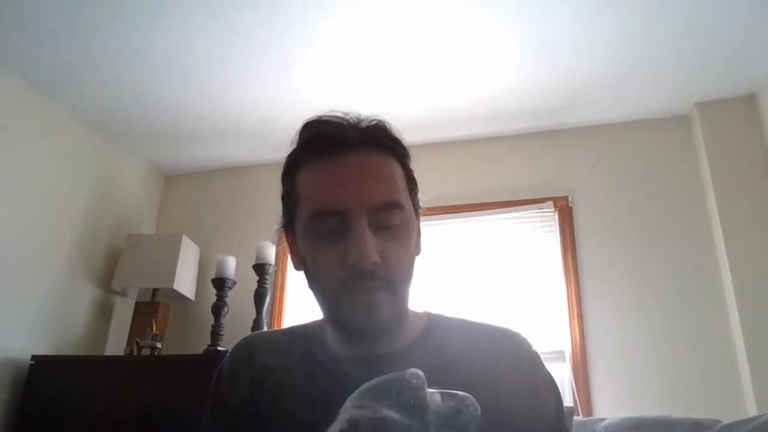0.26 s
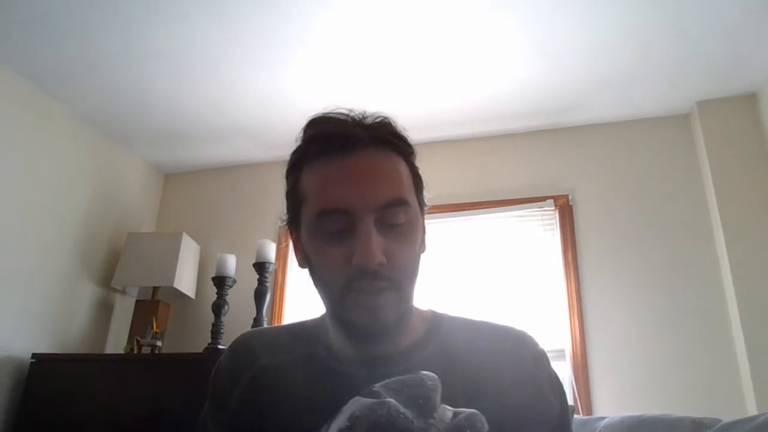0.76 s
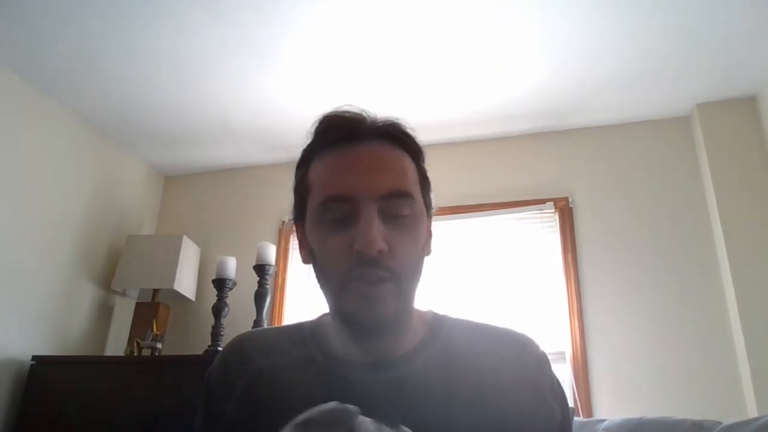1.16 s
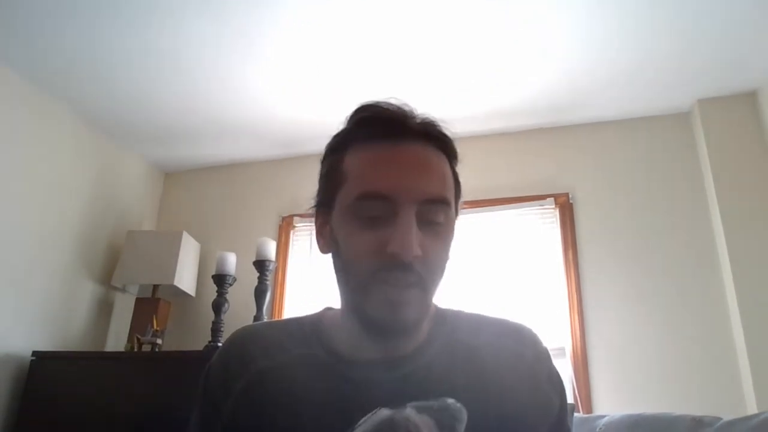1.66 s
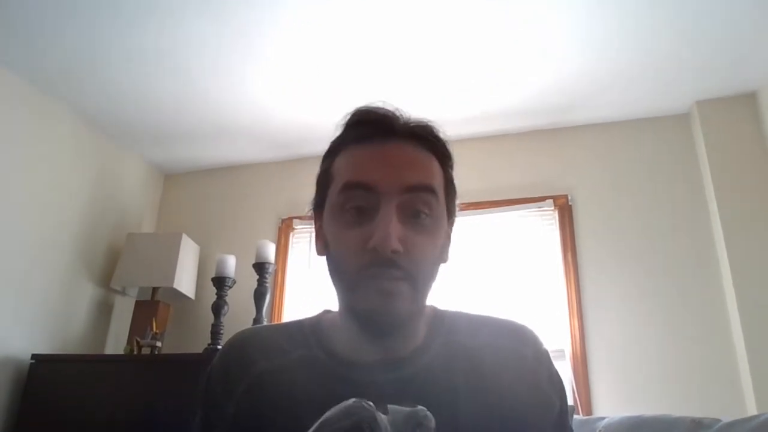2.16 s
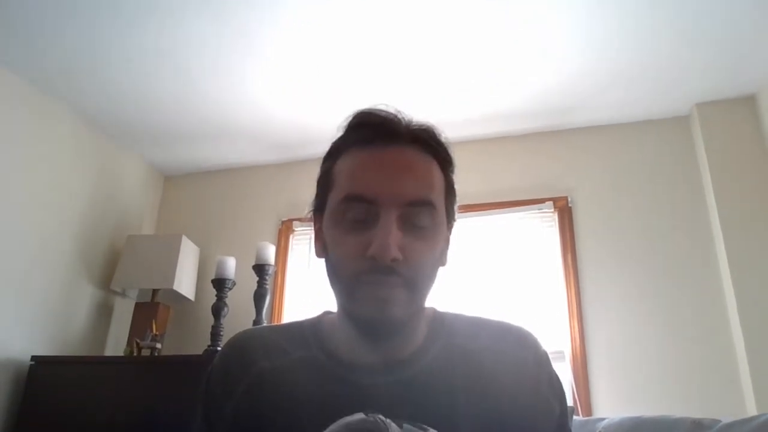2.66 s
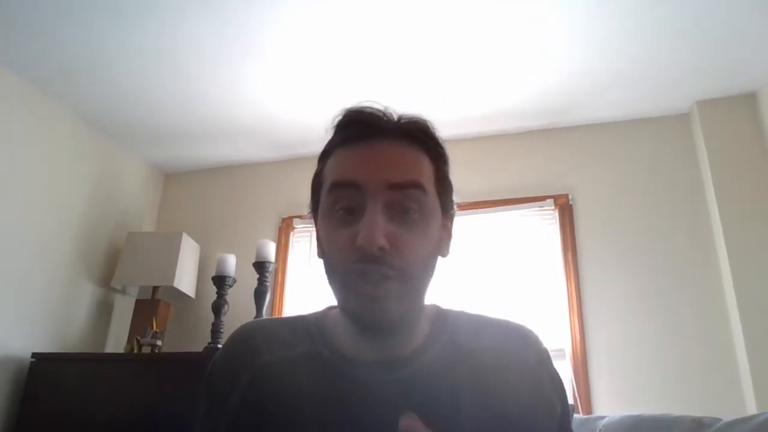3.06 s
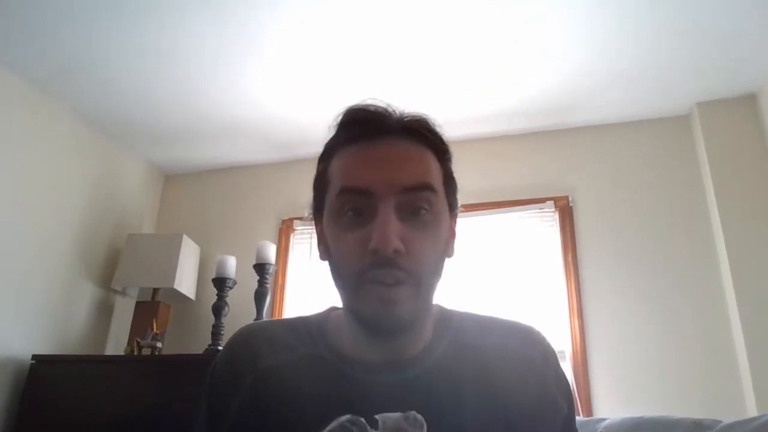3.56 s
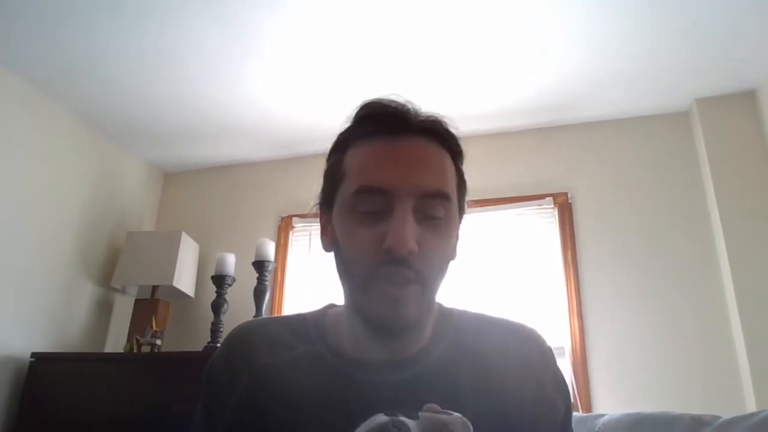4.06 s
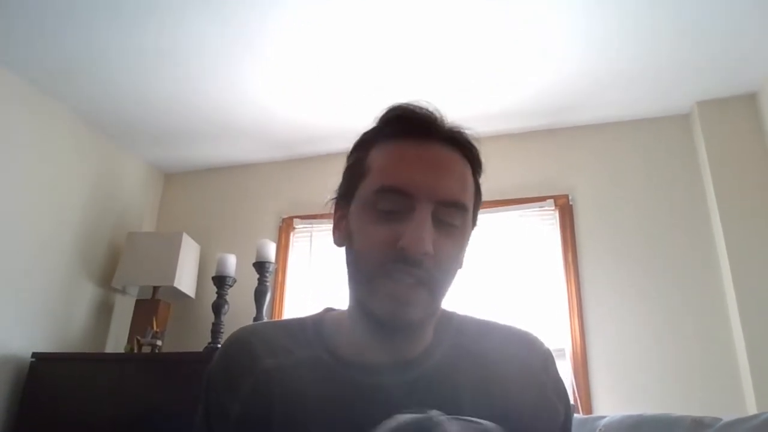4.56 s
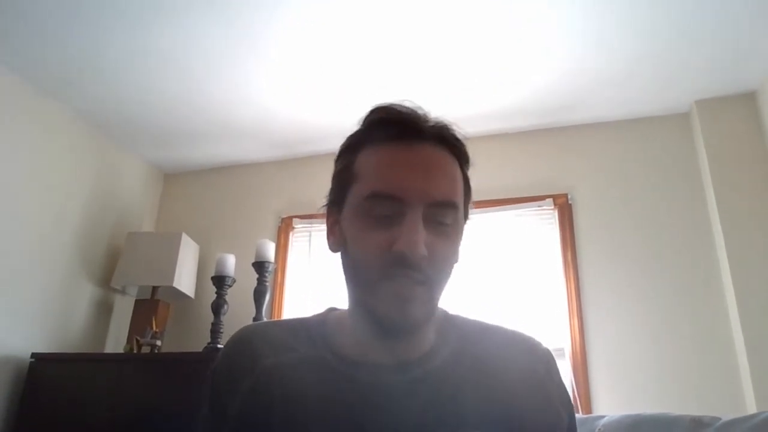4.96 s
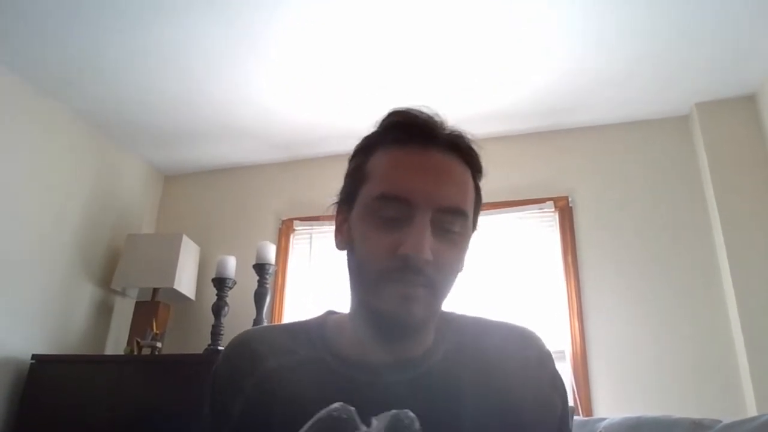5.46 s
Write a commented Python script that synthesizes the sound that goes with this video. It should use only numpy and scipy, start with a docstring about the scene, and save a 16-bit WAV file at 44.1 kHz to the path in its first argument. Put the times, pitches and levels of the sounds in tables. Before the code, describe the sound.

Cloth rubs dryly over a hollow plastic bottle, indoors and close up. The wall creases in sharp little clicks while soft pushes make dull, low, quickly damped knocks. The biggest pop comes early, another cluster of thumps follows, crackling thickens after three seconds, thins out, then ends with strong clustered knocks and snaps. The room answers briefly; the slightly thin microphone adds quiet hiss.

```python
"""A low rumble sinks under the first soft wipes of cloth on an empty plastic bottle turned in the hands.
Cloth scrapes the wall in grains, which are noise shaped by wall and cavity resonances; creases snap as short
noise bursts, and soft knocks ring the hollow body as sums of damped sines.
A furnished room answers briefly with a decaying diffuse tail, over quiet room tone and hiss."""
import sys
import numpy as np
from scipy import signal
from scipy.fft import rfft, irfft, next_fast_len
from scipy.io import wavfile
from scipy.ndimage import uniform_filter1d, map_coordinates

SR = 44100
rng = np.random.default_rng(int(sys.argv[2]) if len(sys.argv) > 2 else 0)


def generate_wav(signal):
    """Clip the signal to [-1, 1] and save it as 16-bit WAV at the path in sys.argv[1]."""
    frames = np.transpose(np.atleast_2d(signal))
    scaled = np.clip(frames, -1, 1) * 32767
    pcm = np.round(scaled).astype(np.int16)
    wavfile.write(sys.argv[1], SR, pcm)


def makeup_ratio(level_db):
    """Linear amplitude ratio for a level in decibels (20 dB per factor of ten)."""
    decades = np.asarray(level_db, float) / 20
    return 10 ** decades


N = 251811  # length in samples


def unit(x):
    """Normalisation of signal power: scaled to rms 1."""
    return x / np.sqrt(np.mean(x ** 2) + 1e-20)


def along(points, hz):
    """Interpolation of (Hz, value) points on a logarithmic frequency axis."""
    point_hz, values = np.transpose(points)
    return np.interp(np.log(hz + 1), np.log(point_hz + 1), values)


def filtered(x, response):
    """Linear filtering: the spectrum of x times a complex response of frequency."""
    size = next_fast_len(len(x) + 8192)
    return irfft(rfft(x, size) * response(np.fft.rfftfreq(size, 1 / SR)), size)[:len(x)]


def resonances(table):
    """Modal superposition: causal second-order resonances (Hz, width Hz, dB), alternating in sign."""
    def response(f):
        total = 0
        for k, (centre, width, db) in enumerate(table):
            damping = 1j * f * width
            total = total + (-1) ** k * makeup_ratio(db) * damping / (centre * centre - f * f + damping)
        return total
    return response


def wobble(rate):
    """Slow random modulation: a smooth curve through random knots, rate knots a second."""
    knots = rng.standard_normal(int(N * rate / SR) + 4)
    return map_coordinates(knots, [np.arange(N) * rate / SR])


def grit(rate, spread_db, life, smooth):
    """Granular friction: noise whose size jumps, rate times a second, in decaying grains of bounded strength.

    life is the decay time constant in seconds; smooth is the share of steady noise."""
    strength = makeup_ratio(spread_db * np.minimum(rng.exponential(size=N), 3))
    starts = (rng.random(N) < rate / SR) * strength
    grains = signal.lfilter([1], [1, -np.exp(-1 / (life * SR))], starts)
    return unit((unit(grains) + smooth) * rng.standard_normal(N))


def patchy(x, depth_db):
    """Time-frequency modulation: random gain patches, depth_db rms."""
    z = signal.stft(x, nperseg=256)[2]
    field = uniform_filter1d(rng.standard_normal(z.shape), size=4, axis=0)
    field = uniform_filter1d(field, size=6, axis=1)
    return unit(signal.istft(z * makeup_ratio(depth_db * unit(field)), nperseg=256)[1][:N])


def passes():
    """Energy addition: every pass of the cloth swells, holds and fades; gives scrape and murmur levels in dB."""
    # Passes of the cloth. Each row: peak time in seconds, rise in seconds, fall in seconds,
    # scrape level in dB, body murmur level in dB; rise and fall each span 20 dB.
    strokes = [(0.04, 0.16, 0.33, -56, -43), (0.17, 0.02, 0.04, -57, -48), (0.34, 0.045, 0.05, -24, -33),
               (0.533, 0.13, 0.18, -35, -43.5), (0.668, 0.014, 0.013, -32.5, -38.5),
               (0.74, 0.24, 0.13, -42.5, -42.5), (0.99, 0.14, 0.26, -51, -49),
               (1.2, 0.11, 0.23, -48.5, -41), (1.392, 0.1, 0.063, -45, -46),
               (1.51, 0.18, 0.069, -51.5, -48), (1.598, 0.079, 0.11, -44, -42.5),
               (1.73, 0.088, 0.051, -48.5, -30), (1.809, 0.055, 0.11, -48.5, -39.5),
               (1.94, 0.078, .07, -44, -54), (2.03, 0.071, 0.037, -54, -45),
               (2.131, 0.074, 0.19, -47, -35.5), (2.402, 0.11, 0.079, -44, -43),
               (2.54, 0.14, 0.29, -54.5, -50), (2.69, 0.068, 0.17, -46, -46),
               (2.855, .075, 0.092, -40, -46), (2.949, 0.018, 0.25, -54.5, -57.5),
               (3.192, 0.19, 0.098, -44.5, -52.5), (3.299, 0.12, 0.11, -42.5, -39.5),
               (3.521, 0.032, 0.079, -40, -39.5), (3.64, 0.16, 0.21, -44, -32.5),
               (3.748, 0.05, 0.11, -40, -34.5), (3.982, 0.082, 0.12, -44.5, -39),
               (4.1, 0.069, 0.71, -57.5, -55), (4.249, 0.053, 0.051, -56.5, -47.5),
               (4.424, 0.018, 0.013, -50, -70.5), (4.64, 0.43, 0.34, -56.5, -58),
               (4.768, 0.08, 0.22, -49, -45.5), (4.961, 0.041, 0.097, -41.5, -36.5),
               (5.08, 0.16, 0.29, -49.5, -39.5), (5.18, 0.069, 0.22, -46, -36),
               (5.321, 0.057, 0.11, -38, -35.5), (5.439, 0.03, .1, -43.5, -38.5),
               (5.682, 0.11, 0.036, -34.5, -29.5)]
    hold = 0.13  # share of the rise and of the fall spent at full pressure
    roundness = 1.05  # 1 = pointed pass, 2 = bell
    t = np.arange(N) / SR
    power = np.full((2, N), 1e-10)
    for s, rise, fall, scrape_db, body_db in strokes:
        away = np.where(t < s, (s - t) / rise, (t - s) / fall)
        away = np.maximum(away - hold, 0) / (1 - hold)
        peak_power = makeup_ratio([[2 * scrape_db], [2 * body_db]])
        power = power + peak_power * makeup_ratio(-2 * 20 * away ** roundness)
    return 10 * np.log10(power)


def wiping():
    """Friction excitation: cloth catches on the wall in grains; the grip sets wall and hollow body murmuring."""
    # Spectrum of the cloth on the wall. Each row: frequency in Hz, gain in dB.
    scrape_curve = [(700, -26), (1400, 0.5), (2000, -1.5), (4000, 4.5), (5500, -0.5), (7000, -3),
                    (8200, -19), (11000, -31)]
    # Spectrum of the finer, brighter fibre noise. Each row: frequency in Hz, gain in dB.
    fibre_curve = [(6000, -33), (7800, 0.5), (9000, 2), (11200, -1), (14000, 3.5), (15800, 2.5)]
    # Resonances colouring the scrape. Each row: frequency in Hz, width in Hz, gain in dB before mixing.
    shell = [(1840, 90, 8.4), (2150, 47, 1), (3200, 170, 0.83), (3786, 33, 4.25), (5220, 1600, 0.55)]
    # Resonances of the hollow body. Each row: frequency in Hz, width in Hz, relative level in dB.
    hollow = [(205, 38, 0.5), (308, 28.5, 6), (420.7, 12, -2.5), (481, 48, -10), (657, 110, -12)]
    # Wall resonances under rubbing. Each row: frequency in Hz, width in Hz, relative level in dB.
    panel = [(934, 44, 3.5), (1050, 17.3, 8.5), (1132, 98, -0.5), (1363, 97, -2), (2050, 145, -7)]
    scrape_db, body_db = passes()
    # the wall, over the body murmur, follows about half of the scrape's lead
    panel_db = -6 + 0.48 * (scrape_db - body_db) + 3.44 * wobble(25)
    catches = grit(rate=400, spread_db=4, life=0.0015, smooth=1.3)
    scrape = filtered(catches, lambda f: makeup_ratio(along(scrape_curve, f)) * (1 + 0.38 * abs(resonances(shell)(f))))
    fibre = filtered(catches, lambda f: makeup_ratio(along(fibre_curve, f)))
    fibre_gain = makeup_ratio(-13 + 3.1 * wobble(30))  # over the scrape
    bright = patchy(scrape, depth_db=2.4) + fibre_gain * patchy(fibre, depth_db=2.4)
    bumps = grit(rate=80, spread_db=-2.5, life=0.0083, smooth=0.74)
    cavity = unit(filtered(bumps, resonances(hollow)))
    wall = unit(filtered(catches, resonances(panel)))
    murmur = cavity + makeup_ratio(panel_db) * wall
    return makeup_ratio(scrape_db + 0.42 * wobble(35)) * bright + makeup_ratio(body_db) * murmur


def rumble():
    """Resonant low-frequency noise: the dull rumble of the arms and seat moving."""
    # Slow course of the rumble. Each row: time in seconds, level in dB before a small random wobble.
    course = [(0.0, -33), (0.13, -45), (0.38, -55), (1.0, -57), (2.3, -51.5), (2.45, -60.5), (3.18, -58.5),
              (3.36, -49.5), (3.5, -52), (4.2, -57), (4.68, -59.5), (5.2, -51), (5.71, -65)]
    low = filtered(rng.standard_normal(N), lambda f: resonances([(110, 90, 0)])(f) ** 2)
    times, levels = np.transpose(course)
    level_db = np.interp(np.arange(N) / SR, times, levels)
    return makeup_ratio(level_db + 1.5 * wobble(4)) * unit(low)


def hush():
    """Stationary background noise: quiet room tone and microphone hiss with a fixed spectrum."""
    # Spectrum of the background. Each row: frequency in Hz, relative level in dB.
    spectrum = [(18, -52), (30, -125), (145, 7), (294, -8), (775, -15), (1060, -30), (1450, -30),
                (2040, -36), (2660, -34), (5120, -70.5), (8200, -47), (14200, -24), (15800, -47)]
    noise = filtered(rng.standard_normal(N), lambda f: makeup_ratio(along(spectrum, f)))
    return makeup_ratio(-60.5) * unit(noise)


def ticks():
    """Random buckling: randomly timed creases give way under the cloth, louder in stronger passes."""
    per_s, top_db = 70, -30  # mean rate; none of these creases is louder than top_db
    over_scrape_db, spread_db = -0.5, 5
    centre_hz, span_octaves, air_db = 3100, 1.6, -9.5
    when, size, pitch = rng.random((int(per_s * N / SR), 3)).T
    db = passes()[0][(when * N).astype(int)] + over_scrape_db
    db = np.minimum(db - spread_db * np.log(1 - 0.9 * size), top_db)
    hz = centre_hz * 2 ** (span_octaves * (pitch - 0.5))
    return [(s, level, f, air_db) for s, level, f in zip(when * N / SR, db, hz)]


def snaps():
    """Snap-through buckling: a crease flips in a sharp click and a short pitched burst with a breath of treble."""
    # Creases snapping at set times. Each row: start in seconds, peak level of the crack in dB, pitch in Hz,
    # peak level of the airy treble over the crack in dB.
    timed_creases = [(0.2942, -29, 4150, -24), (0.3186, -16, 4460, -33), (0.5114, -19.5, 3700, -33),
                     (0.5467, -40, 2540, -25), (0.5734, -22, 4870, -21), (0.6106, -22.5, 2150, -8),
                     (0.6644, -17, 2670, -15.5), (0.7217, -25.5, 1930, -25), (0.7587, -33, 2180, -14),
                     (0.816, -29.5, 3830, -16), (0.8566, -17.5, 3330, -35), (0.989, -2, 1960, -60),
                     (0.992, -33, 3100, -50), (1.1845, -32.5, 4830, -1), (1.2173, -24, 3350, -5),
                     (1.3546, -28, 3900, -21), (1.3906, -25, 2050, -13), (1.5913, -50, 4940, -10),
                     (1.6786, -22.5, 3600, -33), (1.717, -19.5, 2660, -38), (1.7703, -32.5, 2130, -29),
                     (1.92, -29, 4140, -3), (2.0787, -38.5, 2500, 0), (2.1053, -17, 3120, -13),
                     (2.1336, -18, 3760, -10), (2.3977, -34, 3870, -21), (2.53, -27.5, 3400, -37),
                     (2.594, -37.5, 1800, -32), (2.665, -27, 2370, -5), (2.718, -34, 2100, -7),
                     (3.276, -25, 5570, -24), (3.2979, -28, 1820, -11), (3.4824, -22.5, 4700, -15),
                     (3.4962, -34, 3870, 3), (3.52, -20, 1660, -8), (3.5403, -34, 1610, -10),
                     (3.559, -30, 3840, -24), (3.6128, -27.5, 3700, -15), (3.6326, -18, 3230, -19),
                     (3.653, -12, 3900, -35), (3.6608, -17, 1900, -29), (3.677, -37.5, 4700, 11),
                     (3.709, -24, 3750, -24), (3.7436, -21.5, 1700, -9), (3.8078, -30.5, 6240, -17),
                     (3.9839, -18, 3900, -21), (3.9996, -26, 4270, -23), (4.4166, -35, 2500, -5),
                     (4.6171, -44, 3470, -12), (4.653, -36.5, 2580, -14), (4.761, -18, 2440, -4),
                     (4.814, -38, 5100, -6), (4.898, -34, 4230, -39), (4.9551, -20, 1830, -16),
                     (5.037, -30, 2010, -11), (5.101, -25.5, 2050, -10), (5.2057, -39, 2090, 6),
                     (5.2487, -26, 2150, -7.5), (5.3117, -21, 1920, -14), (5.3353, -23, 3680, -27),
                     (5.6445, -14.5, 3470, -27), (5.6775, -18.5, 1660, -26), (5.683, -12, 2480, -15)]
    creases = timed_creases + ticks()
    out = np.zeros(N + SR)
    t = np.arange(SR // 20) / SR
    noises = rng.standard_normal((len(creases), len(t)))
    for (s, db, hz, air_db), noise in zip(creases, noises):
        # higher creases die sooner, stronger ones later
        t60 = 0.011 * (2870 / hz) ** 0.15 * 2 ** ((db + 22) / 35)
        burst = noise * makeup_ratio(-60 * t / t60) * (1 - np.exp(-t / 0.00021))
        burst[round(0.0004 * SR)] += 3.2  # the flip itself
        colour = resonances([(hz, 0.6 * hz, 0), (1.56 * hz, 1.72 * hz, -4), (0.36 * hz, 0.56 * hz, -9)])
        # steep fall above the pitch
        crack = filtered(burst, lambda f: colour(f) / (1 + 1j * f / (2.7 * hz)) ** 2)
        softened = burst * (1 - np.exp(-t / 0.00033))
        air = filtered(softened, lambda f: resonances([(13500, 7000, 0)])(f) ** 2)
        snap = crack / abs(crack).max() + makeup_ratio(air_db) * air / abs(air).max()
        out[round(s * SR):][:len(t)] += makeup_ratio(db) * snap
    return out[:N]


def knocks():
    """Modal ringing: a soft push rings the squeezed cavity, body modes, and the wall by an amount set per knock."""
    # Knocks on the body. Each row: start in seconds, peak level in dB, main pitch in Hz,
    # offset of the wall modes in dB, t60 of the main pitch in seconds.
    pushes = [(0.349, -30, 332, -23, 0.097), (0.484, -33, 314, -29, 0.35), (0.666, -29, 307, -26, 0.044),
              (0.992, -8, 316, -11, 0.055), (0.998, -11.5, 313, -2, 0.048), (1.189, -33.5, 318, 4, 0.2),
              (1.23, -13, 326, -8, 0.039), (1.394, -29, 191, -15, 0.022), (1.684, -9, 322, -22, 0.091),
              (1.697, -15, 417, -18, 0.036), (1.706, -13.5, 238, -16, 0.064), (1.722, -18, 303, -17, 0.049),
              (1.738, -28, 484, -28, 0.062), (1.903, -26.5, 264, -34, 0.023),
              (1.934, -26.5, 285, -42, 0.14), (2.131, -14, 337, -3.5, 0.045), (2.148, -27, 492, -18, 0.052),
              (2.168, -30.5, 317.5, -12, 0.24), (2.4, -27, 294, -6, 0.089), (2.668, -37, 307, 11, 0.04),
              (2.866, -37, 169, -17, 0.14), (3.296, -26, 270, 0, 0.019), (3.3, -34.5, 582, -20, 0.05),
              (3.342, -35.5, 285, -20, 0.056), (3.484, -33.5, 196, -1, 0.081),
              (3.519, -15, 278.6, -22, 0.054), (3.559, -25.5, 284, -10, 0.053),
              (3.628, -28, 235, -25, 0.11), (3.656, -22, 279, -13, 0.099), (3.674, -20.5, 294, -10, 0.069),
              (3.742, -30, 231, -2, 0.066), (3.974, -32, 305, -26, 0.11), (4.004, -19.5, 269, -14.5, 0.068),
              (4.13, -36, 281, -28, 0.061), (4.742, -31, 179, -33, 0.14), (4.958, -16.5, 318, 10, 0.019),
              (5.081, -28, 297, -4, 0.25), (5.154, -38, 282.5, -18, 0.3), (5.303, -25.5, 292, 4, 0.035),
              (5.435, -33, 622, -8, 0.081), (5.653, -7, 270, -2.5, 0.02), (5.663, -14, 438, -39, 0.09),
              (5.674, -11.5, 191, -36, 0.16), (5.683, -13.5, 205, -1, 0.039), (5.69, -14.5, 604, -23, 0.03)]
    # Modes of the hollow body. Each row: frequency in Hz, level in dB before weakening away from the pitch,
    # decay time as a share of the knock's t60.
    body = [(202.4, -12.5, 2.13), (238, -16, 0.96), (387.5, -0.5, 0.34), (487, -12, 1.2), (660, -9, 0.99)]
    # Wall modes, raised or lowered by each knock's offset. Each row: frequency in Hz, level in dB before
    # that offset, decay time as a share of the knock's t60.
    wall = [(872, -6, 0.41), (1019, 2, 0.42), (1235, -4, 0.49), (1442, -7.5, 0.32)]
    out = np.zeros(N + SR)
    t = np.arange(SR // 4) / SR
    scatter_db = 1.5 * rng.standard_normal((len(pushes), len(body) + len(wall) + 1))
    for (s, db, hz, upper_db, t60), luck in zip(pushes, scatter_db):
        modes = [(hz, 0, 1)]
        modes += [(f, level - 8 * abs(np.log2(f / hz)), share) for f, level, share in body]
        modes += [(f, level + upper_db, share) for f, level, share in wall]
        ring = np.zeros(len(t))
        for (f, level, share), extra_db in zip(modes, luck):
            fade_db = 60 * (t / (share * t60)) ** 1.2  # the hand closes in: damping grows
            ring += makeup_ratio(level + extra_db - fade_db) * np.sin(2 * np.pi * f * t)
        ring = ring * (1 - np.exp(-t / 0.0021)) ** 2  # soft contact: slow rise
        out[round(s * SR):][:len(t)] += makeup_ratio(db) * ring / abs(ring).max()
    return out[:N]


def room(x):
    """Diffuse reverberation: a decaying noise tail, drawn anew every third of a second."""
    # Decay of the furnished room. Each row: frequency in Hz, t60 in seconds.
    decay = [(200, 0.19), (1000, 0.24), (4000, 0.12), (12000, 0.11)]
    out = np.zeros(N + 2 * SR)
    step = SR // 3
    for start in range(0, N, step):
        hz, t, z = signal.stft(rng.standard_normal(SR // 2), SR, nperseg=256)
        fade = makeup_ratio(-60 * t / along(decay, hz)[:, None])
        tail = signal.istft(z * fade, SR, nperseg=256)[1]
        wet = signal.fftconvolve(x[start:start + step], tail / np.linalg.norm(tail))
        out[start + 150:][:len(wet)] += wet  # the tail begins 150 samples (3.4 ms) late
    return out[:N]


def scene():
    """Direct and reverberant superposition: bright snaps fill the room more than the near-field knocks."""
    crisp, dull = snaps(), knocks()
    wet = room(makeup_ratio(-6.5) * crisp + makeup_ratio(-13.5) * dull)
    return (crisp + dull + wet + wiping() + rumble() + hush())[None]


def band_limit(x):
    """A steep low-pass at the top of the band."""
    return signal.sosfilt(signal.butter(12, 16660, fs=SR, output="sos"), x)


def record(dry):
    """Band limitation: the small microphone loses the deep bass and the top treble."""
    def microphone(f):
        bass_loss = (1j * f / (70 + 1j * f)) ** 2
        return bass_loss * np.where(f < 15850, 1, makeup_ratio(-27))
    thin = filtered(dry[0], microphone)
    return band_limit(thin[None])


dry = scene()
out = record(dry)
generate_wav(out)
```